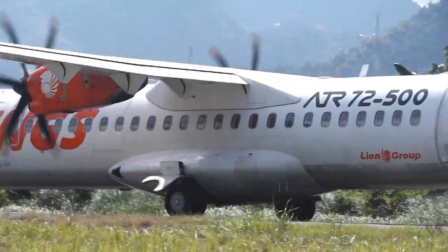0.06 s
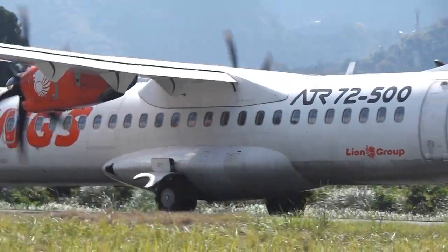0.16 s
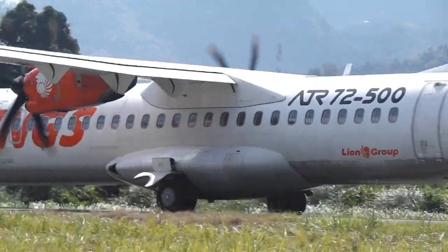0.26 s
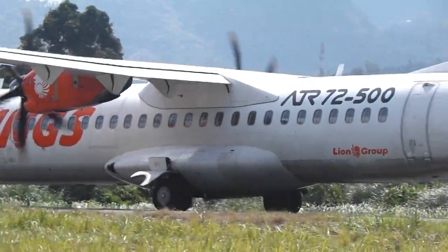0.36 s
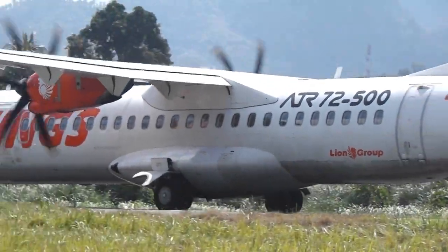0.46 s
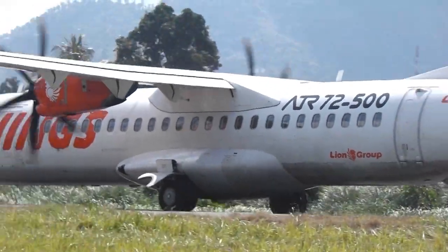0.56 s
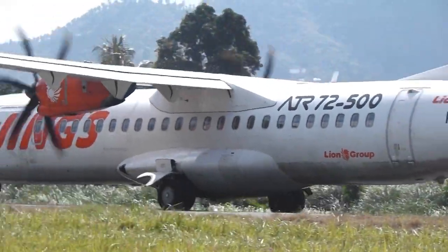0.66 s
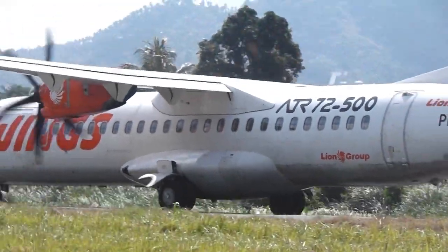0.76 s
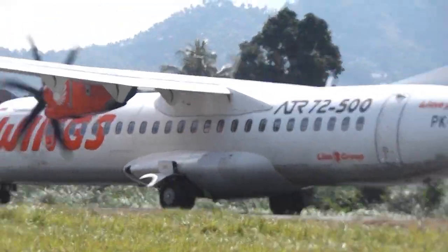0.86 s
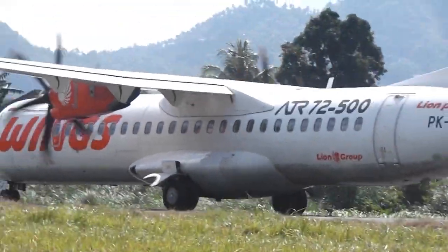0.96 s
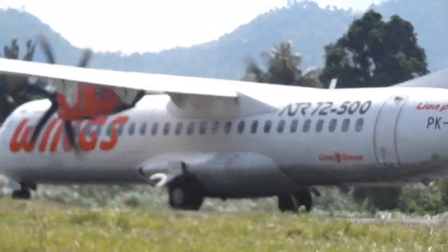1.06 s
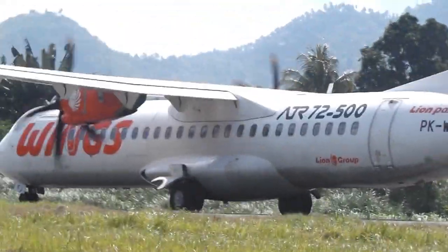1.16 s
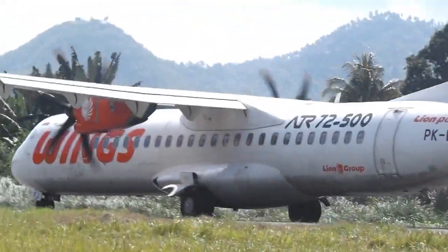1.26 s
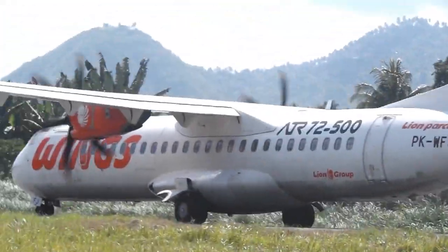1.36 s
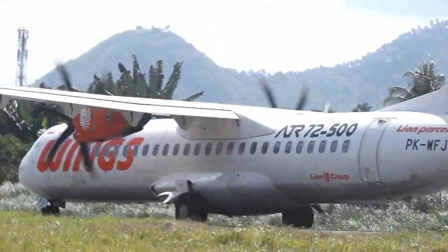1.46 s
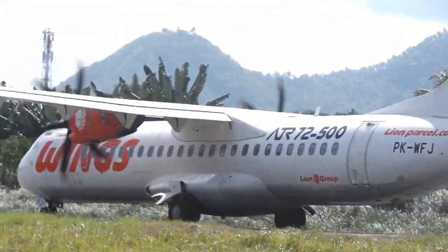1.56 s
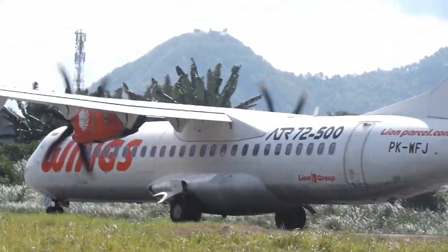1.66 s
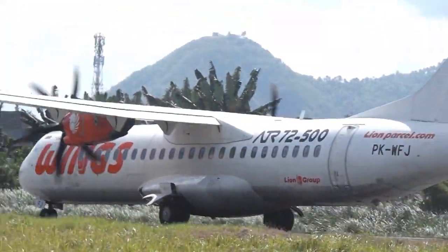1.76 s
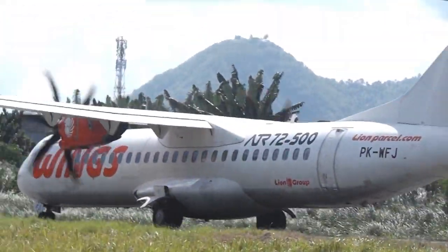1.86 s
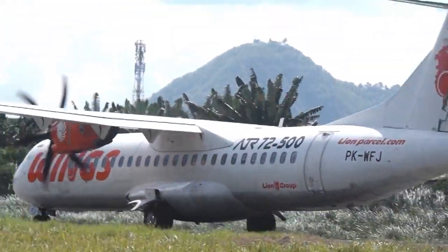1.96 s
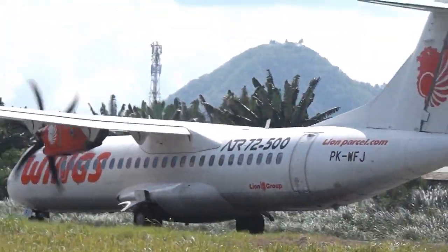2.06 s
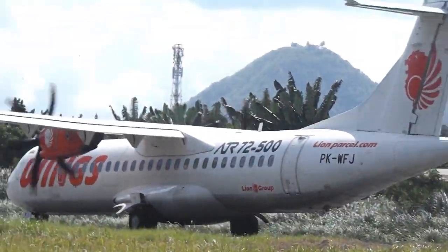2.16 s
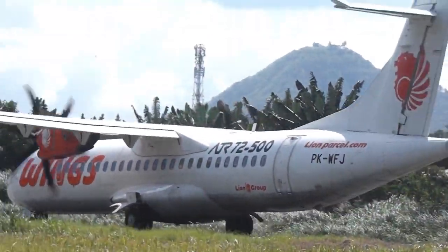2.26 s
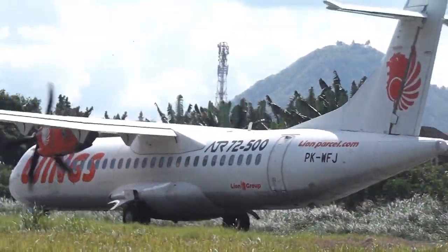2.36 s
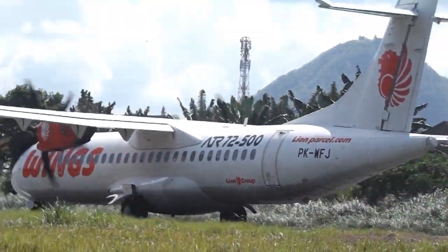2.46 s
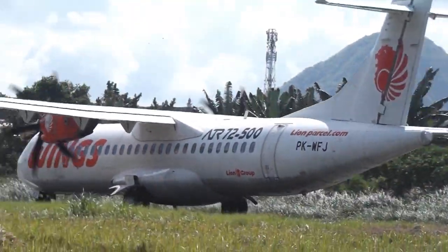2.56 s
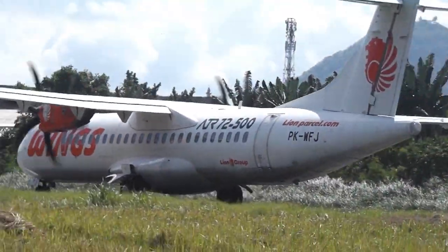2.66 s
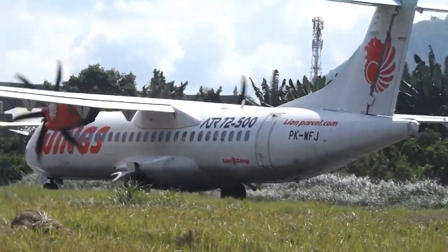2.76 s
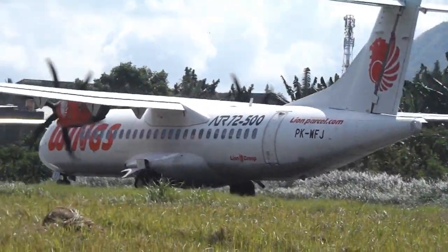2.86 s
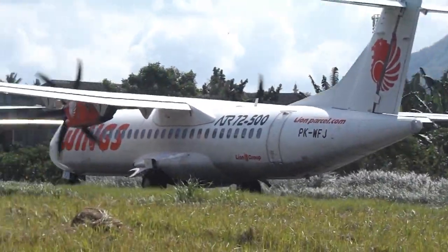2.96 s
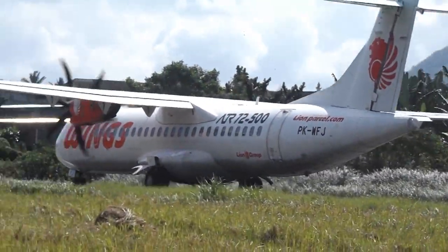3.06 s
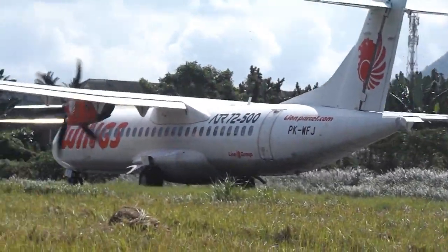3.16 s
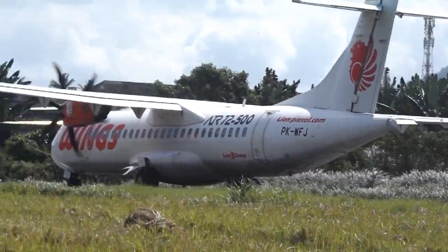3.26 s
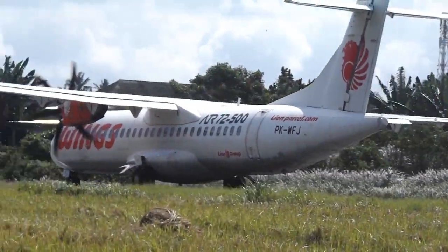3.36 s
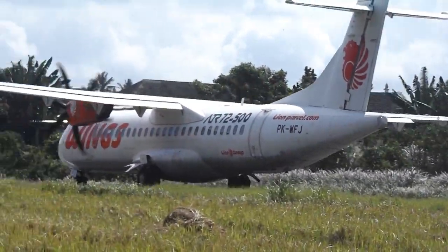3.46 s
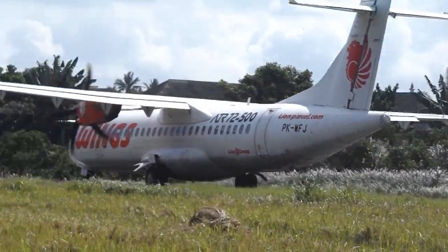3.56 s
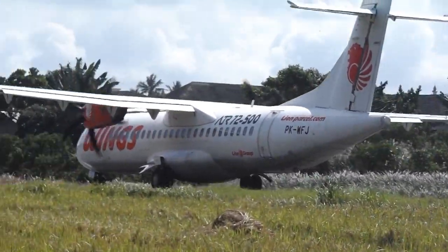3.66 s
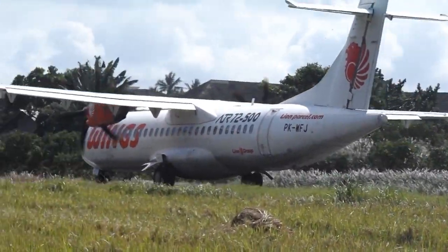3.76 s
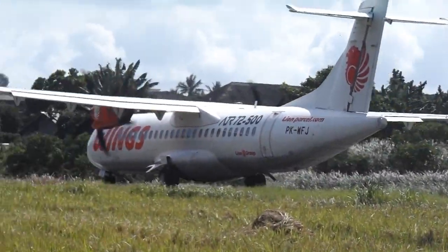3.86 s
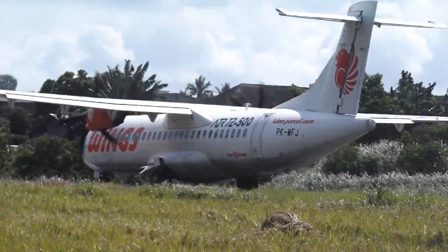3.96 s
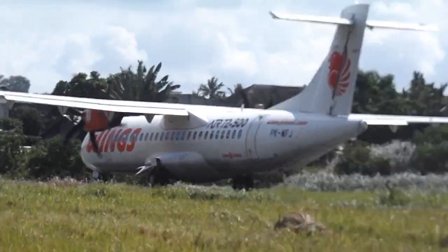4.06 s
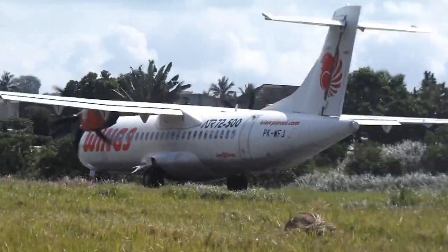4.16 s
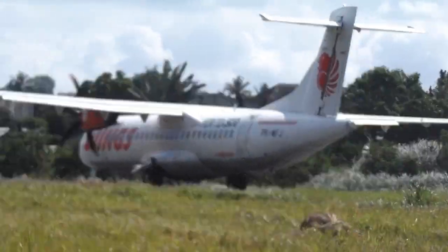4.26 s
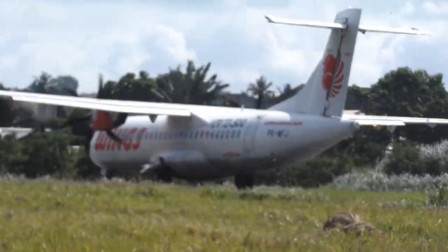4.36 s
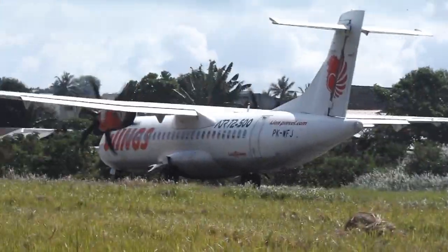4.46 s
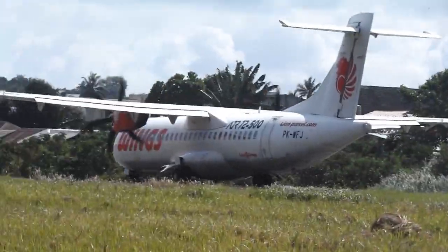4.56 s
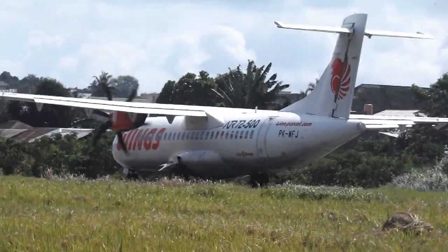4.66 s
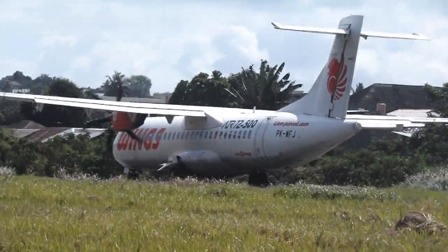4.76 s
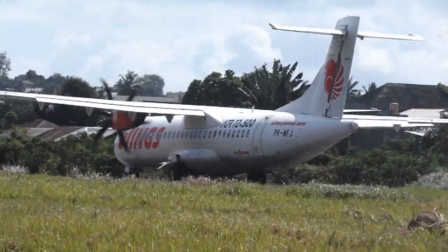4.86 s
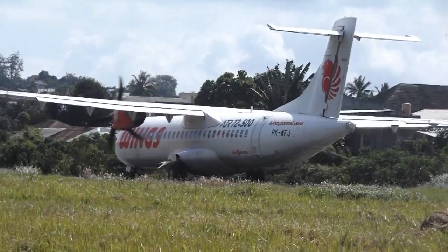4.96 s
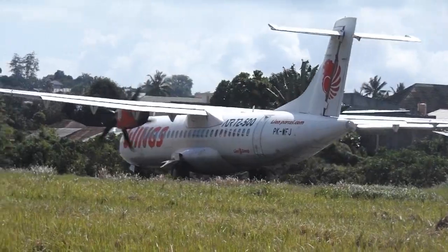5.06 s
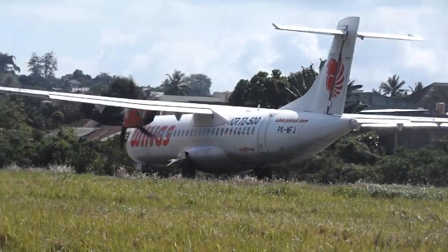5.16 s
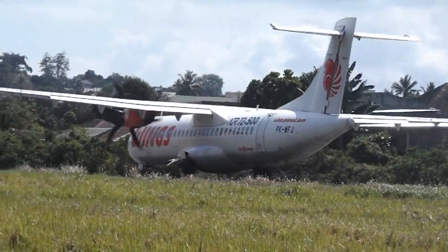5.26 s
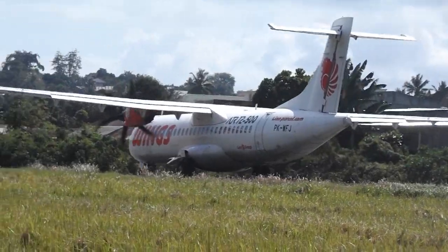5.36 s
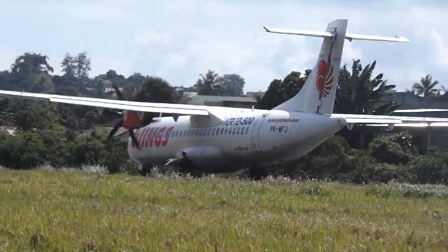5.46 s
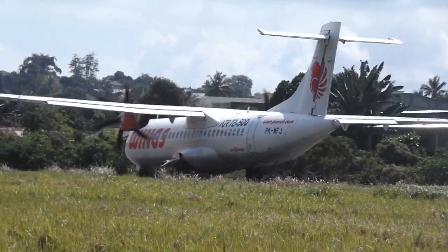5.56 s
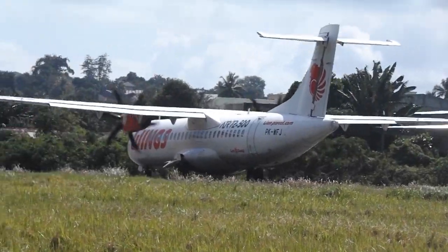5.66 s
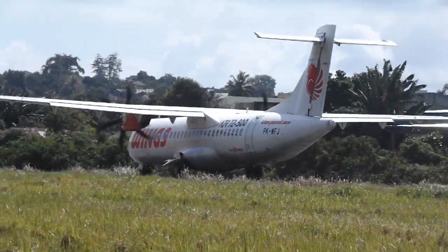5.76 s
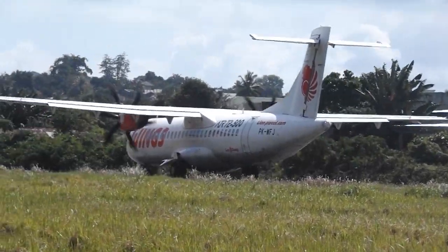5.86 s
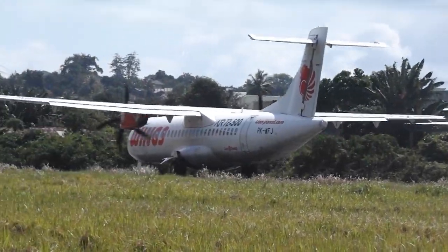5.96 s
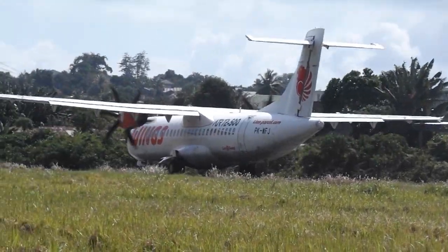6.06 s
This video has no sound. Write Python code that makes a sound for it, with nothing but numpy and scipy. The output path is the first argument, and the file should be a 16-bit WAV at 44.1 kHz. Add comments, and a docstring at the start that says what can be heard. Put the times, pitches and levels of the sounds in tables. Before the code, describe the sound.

A twin turboprop plane taxis past close by, its loud rush, turbine whine and propeller buzz fading and dulling as it rolls away.

```python
"""Twin turboprop taxiing away

An airliner taxis past and rolls off along a grass-edged runway, heard by one microphone.
The rush of exhaust and propeller wash fades and dulls with distance, rippled by a ground echo and
short reflections near the microphone. Faint turbine whines ride above it, an engine drone and the
propellers' buzz below. Narrow tones swell out of the rush; late on, a low hum throbs four times."""
import sys
import numpy as np
from scipy import signal
from scipy.fft import rfft, irfft, next_fast_len
from scipy.io import wavfile

SR = 44100
rng = np.random.default_rng(int(sys.argv[2]) if len(sys.argv) > 2 else 0)


def wav_record(signal):
    """Record a signal, one row per channel, as 16-bit PCM in the file named by sys.argv[1]."""
    frames = np.transpose(np.atleast_2d(signal))
    bounded = np.clip(frames, -1, 1)
    # unit amplitude maps onto the largest positive 16-bit level
    quanta = np.round(bounded * 32767).astype(np.int16)
    wavfile.write(sys.argv[1], SR, quanta)


N = 268549
TIME_S = np.arange(N) / SR
FARNESS = np.clip(TIME_S / 4.5, 0, 1)   # 0 alongside, 1 tail-on


def from_db(db):
    """Decibels to gain."""
    return 10 ** (np.asarray(db) / 20)


def unit_rms(x):
    """Scale to rms 1."""
    return x / np.sqrt(np.mean(x ** 2) + 1e-20)


def curves(rows):
    """Interpolate each column after time_s to one value per sample."""
    times_s, *columns = np.transpose(rows)
    return [np.interp(TIME_S, times_s, column) for column in columns]


def bell(peak_s, half_s):
    """Gaussian envelope of height 1."""
    return np.exp(-((TIME_S - peak_s) / half_s) ** 2)


def drift(corner_hz):
    """Slow random wander, rms 1."""
    hop, settle = 40, 2000
    pole = np.exp(-2 * np.pi * corner_hz * hop / SR)
    noise = rng.standard_normal(N // hop + settle + 2)
    slow = signal.lfilter([1], [1, -2 * pole, pole * pole], noise)[settle:]
    return np.interp(np.arange(N) / hop, np.arange(len(slow)), unit_rms(slow - slow.mean()))


def delayed(x, delay_ms):
    """Fractional-sample delay by phase shift."""
    size = next_fast_len(N)
    cycles = np.arange(size // 2 + 1) * SR / size * delay_ms / 1000
    return irfft(rfft(x, size) * np.exp(-2j * np.pi * cycles), size)[:N]


def narrow_noise(pitch_hz, width_hz):
    """Noise passed twice through one resonance, rms 1."""
    radius = np.exp(-np.pi * width_hz / SR)
    poles = [1, -2 * radius * np.cos(2 * np.pi * pitch_hz / SR), radius * radius]
    once = signal.lfilter([1, 0, -1], poles, rng.standard_normal(N))
    return unit_rms(signal.lfilter([1], poles, once))


# Rush spectrum: freq_hz, relative_density_db
RUSH_SPECTRUM = [(20, -57), (60, -30), (120, -14.5), (190, -17.5), (350, -18.5), (420, -13), (700, -7.5),
                 (1050, -2.5), (1800, -2), (3600, -4), (5900, -3.5), (7500, -10), (9200, -17),
                 (11000, -26.5), (15500, -43.5)]
ROAR_CORNER_HZ, RUMBLE_CORNER_HZ, LOSS_PIVOT_HZ = 1410, 403, 3060


def rush(roar_db, rumble_db, loss_db_per_khz, treble_flicker_db, band_flicker_db):
    """Exhaust and propeller wash in half-octave bands: air absorbs treble, turbulence adds flicker."""
    size = next_fast_len(N)
    octave = np.log2(np.maximum(np.arange(size // 2 + 1) * SR / size, 1))
    freq_hz, density_db = np.transpose(RUSH_SPECTRUM)
    spectrum = rfft(rng.standard_normal(size)) * from_db(np.interp(octave, np.log2(freq_hz), density_db))
    spectrum /= np.std(irfft(spectrum, size))
    roar_db, rumble_db = roar_db - roar_db.mean(), rumble_db - rumble_db.mean()
    out, treble_drift = np.zeros(N), drift(10.6)
    for centre_octave in np.arange(4.5, 14.6, .5):
        centre_hz = 2 ** centre_octave
        window = np.cos(np.pi * np.clip(octave - centre_octave, -.5, .5)) ** 2
        low_share = 1 / (1 + (centre_hz / ROAR_CORNER_HZ) ** 4)
        bass_share = 1 / (1 + (centre_hz / RUMBLE_CORNER_HZ) ** 4)
        swell_db = roar_db * (low_share - bass_share) + rumble_db * bass_share
        offset_khz = (max(centre_hz, ROAR_CORNER_HZ) - LOSS_PIVOT_HZ) / 1000
        loss_db = loss_db_per_khz * offset_khz * (1 - low_share)
        flicker_db = treble_flicker_db * (1 - low_share) * treble_drift + band_flicker_db * drift(3.4)
        out += irfft(spectrum * window, size)[:N] * from_db(swell_db - loss_db + flicker_db)
    return out


# Turbine tones, levels re rush: pitch_hz, width_hz, near_db, far_db
TURBINE_TONES = [(1085, 38, -38, -18.5), (1497, 100, -28, -28), (1589, 105, -35, -17.5),
                 (1947, 34, -18.5, -23.5), (2452, 120, -18.5, -22), (3396, 150, -19, -50),
                 (3930, 30, -35, -42), (4390, 260, -16.5, -17.5), (5530, 71, -23, -27),
                 (6810, 30, -29, -22), (7370, 170, -28.5, -31), (8800, 30, -38, -26)]


def turbine_whines(loss_db_per_khz, waver_db=2):
    """Compressor and gear tones blurred by turbulent air; their balance shifts as the tail turns."""
    out = np.zeros(N)
    for pitch_hz, width_hz, near_db, far_db in TURBINE_TONES:
        level_db = near_db + (far_db - near_db) * FARNESS + waver_db * drift(1.6)
        loss_db = loss_db_per_khz * (pitch_hz - LOSS_PIVOT_HZ) / 1000
        out += narrow_noise(pitch_hz, width_hz) * from_db(level_db - loss_db)
    return out


# Roll-away: time_s, level_db, roar_db, rumble_db, air_loss_db_per_khz
# Roar and rumble act only as swings about their means.
ROLL_AWAY = [(0.0, -16, -15, -34, -0.2), (0.1, -19, -9, -32.5, -0.5), (0.24, -19.5, -6.5, -34, -0.05),
             (0.55, -18.5, -12, -32.5, 0), (1.0, -23, -9.5, -30, -0.05), (1.5, -26.5, -9.5, -27.5, -0.15),
             (1.9, -29, -8.5, -26.5, -0.14), (2.6, -31.5, -7.5, -25.5, 0.1), (3.0, -31.5, -8, -27, 0.25),
             (3.8, -33, -4, -30, 0.5), (4.08, -32.5, -6, -28.5, 0.9), (4.65, -34, -10, -28.5, 0.8),
             (5.44, -37.5, -5.5, -27.5, 0.8), (6.09, -39, -7, -28, 0.6)]


def engines(surge_db):
    """Rush and whines fade and dull with distance; a surge lifts the treble and thins the lows."""
    level_db, roar_db, rumble_db, loss_db_per_khz = curves(ROLL_AWAY)
    roar_db = roar_db - 1.44 * surge_db
    rumble_db = rumble_db - 1.5 * surge_db
    loss_db_per_khz = loss_db_per_khz + 0.057 * surge_db
    wash = rush(roar_db, rumble_db, loss_db_per_khz, treble_flicker_db=0.42, band_flicker_db=0.6)
    return from_db(level_db + surge_db) * (wash + turbine_whines(loss_db_per_khz))


# Ground arrivals: delay_ms, relative_gain
GROUND_PATHS = [(2.05, 0.68), (2.28, -0.45)]


def ground_echo(x, surge_db, near_gain=0.56, fade_s=2.9, cutoff_hz=2350):
    """Grass and runway add dull, late copies, weaker with distance and stronger in a surge."""
    strength = np.clip(near_gain * np.exp(-TIME_S / fade_s) + 0.07 * surge_db, 0, 1)
    dull = signal.sosfiltfilt(signal.butter(2, cutoff_hz, fs=SR, output="sos"), x)
    return x + strength * sum(gain * delayed(dull, delay_ms) for delay_ms, gain in GROUND_PATHS)


# Reflections near the microphone: delay_ms, gain
NEAR_PATHS = [(0.59, -0.019), (1.18, 0.052)]


def near_reflections(x):
    """Weak, short echoes ripple the spectrum."""
    return x + sum(gain * delayed(x, delay_ms) for delay_ms, gain in NEAR_PATHS)


# Drone envelope: time_s, level_db
DRONE_LEVELS = [(0, -46), (0.12, -39.5), (0.2, -47.5), (1.1, -50.5), (1.9, -53), (2.3, -64), (2.74, -55),
                (2.9, -69), (4.1, -68), (4.33, -63), (5.2, -76), (5.41, -63), (6.09, -69)]
# Brief drone dips: centre_s, depth_db
DRONE_DIPS = [(1.01, 10), (1.6, 8), (1.83, 12), (2.42, 16), (2.59, 14), (4.55, 14)]


def engine_drone(near_hz=126.6, far_hz=124, near_flutter_db=2.5, far_flutter_db=3.5):
    """Low engine tone; it sags in pitch as the aircraft leaves and flutters more as the air path grows."""
    sag = .5 + .5 * np.tanh((TIME_S - 0.9) / 0.34)
    phase = 2 * np.pi * np.cumsum(near_hz + (far_hz - near_hz) * sag) / SR
    dip_db = sum(depth_db * bell(centre_s, half_s=0.043) for centre_s, depth_db in DRONE_DIPS)
    flutter_db = (near_flutter_db + (far_flutter_db - near_flutter_db) * FARNESS) * drift(13)
    return np.sqrt(2) * np.sin(phase) * from_db(curves(DRONE_LEVELS)[0] - dip_db + flutter_db)


# Buzz envelope: time_s, level_db
BUZZ_LEVELS = [(0, -39), (1, -38.5), (2, -42.5), (3, -45), (3.8, -47), (4.7, -43.5), (5.5, -44.5),
               (6.09, -49)]
# Buzz spectrum: freq_hz, relative_db
BUZZ_SPECTRUM = [(390, -19.5), (545, -8), (700, -2), (780, -0.5), (860, -0.5), (940, -1.5), (1020, -1),
                 (1100, -6), (1170, 0.5), (1330, -4), (1570, -9), (1650, -1.5), (1900, -26)]


def propeller_buzz(blade_rate_hz=78.2, width_ratio=0.018):
    """Blade-rate overtones; two engines and moving air blur each into a narrow flickering band."""
    freq_hz, relative_db = np.transpose(BUZZ_SPECTRUM)
    overtones = sum(from_db(np.interp(hz, freq_hz, relative_db)) * narrow_noise(hz, width_ratio * hz)
                    for hz in blade_rate_hz * np.arange(5, 25))
    return from_db(curves(BUZZ_LEVELS)[0]) * unit_rms(overtones)


# Swelling tones: peak_s, pitch_hz, width_hz, half_length_s, level_db
TONE_FLARES = [(0.1, 7330, 60, 0.15, -36), (0.2, 9020, 60, 0.28, -40), (0.33, 5460, 60, 0.22, -30),
               (0.32, 3456, 79.6, 0.1, -24.5), (0.8, 4320, 120, 0.21, -34), (1.9, 8900, 40.1, 0.14, -54),
               (2.3, 4320, 150, 0.13, -40), (2.85, 8950, 40, 0.14, -59), (4.097, 1108, 25, 0.25, -43),
               (4.15, 1587, 60, 0.26, -47), (5.35, 1590, 45, 0.6, -49), (0.03, 4200, 350, 0.08, -26),
               (0.36, 2430, 70, 0.07, -25), (4.5, 4410, 50, 0.6, -55)]


def tone_flares():
    """Single narrow tones swell out of the rush and sink back."""
    return sum(from_db(level_db) * bell(peak_s, half_s) * narrow_noise(pitch_hz, width_hz)
               for peak_s, pitch_hz, width_hz, half_s, level_db in TONE_FLARES)


def breeze(level_db=-86, gust_db=16, waver_db=2.7):
    """Wind on the microphone: faint, lumpy low noise with one gust."""
    low = signal.sosfilt(signal.butter(2, [45, 100], "band", fs=SR, output="sos"), rng.standard_normal(N))
    swell_db = gust_db * bell(peak_s=5.3, half_s=0.55) + waver_db * drift(2.7)
    return from_db(level_db + swell_db) * unit_rms(low)


# Rush surges: peak_s, half_rise_s, rise_db
RUSH_SURGES = [(0.3, 0.06, 6), (1.99, 0.04, 1), (2.72, 0.05, 2.5)]


def surges_db(fall_stretch=2.2):
    """Brief lifts of the rush: quick swell, slower fall."""
    return sum(rise_db * bell(peak_s, np.where(TIME_S < peak_s, half_s, fall_stretch * half_s))
               for peak_s, half_s, rise_db in RUSH_SURGES)


def throbbing_hum(start_s=3.965, throb_s=0.109, count=4, pitch_hz=273, level_db=-53):
    """A low tone swells and sinks in even throbs."""
    throbs_done = np.clip((TIME_S - start_s) / throb_s, 0, count)
    envelope = np.abs(np.sin(np.pi * throbs_done)) ** 3
    return from_db(level_db) * envelope * np.sin(2 * np.pi * pitch_hz * TIME_S)


def scene():
    """Engines with their echoes, plus tones and breeze; the same in both channels."""
    surge_db = surges_db()
    echoed = near_reflections(ground_echo(engines(surge_db), surge_db))
    tones = engine_drone() + propeller_buzz() + tone_flares() + throbbing_hum()
    return np.tile(echoed + tones + breeze(), (2, 1))


def record(dry):
    """Amplifier hiss, a narrow notch and a steep low-pass."""
    hiss_db, hiss_low_hz = -67.5, 6000
    notch_hz, notch_width_hz, cutoff_hz = 7000, 78, 15700
    highpass = signal.butter(2, hiss_low_hz, "high", fs=SR, output="sos")
    hiss = from_db(hiss_db) * signal.sosfilt(highpass, rng.standard_normal(N))
    notched = signal.lfilter(*signal.iirnotch(notch_hz, notch_hz / notch_width_hz, fs=SR), dry + hiss)
    return signal.sosfilt(signal.ellip(12, .5, 60, cutoff_hz, fs=SR, output="sos"), notched)


dry = scene()
out = record(dry)
wav_record(out)
```